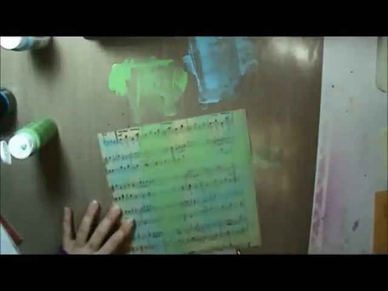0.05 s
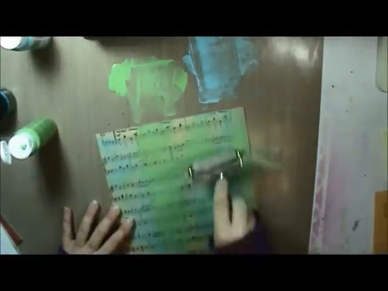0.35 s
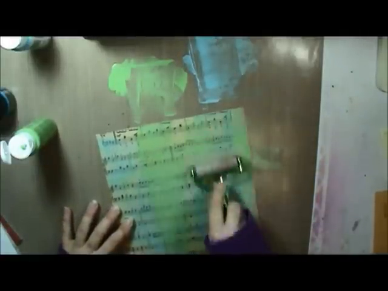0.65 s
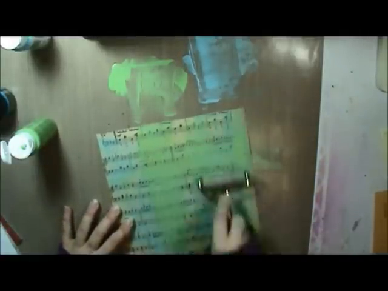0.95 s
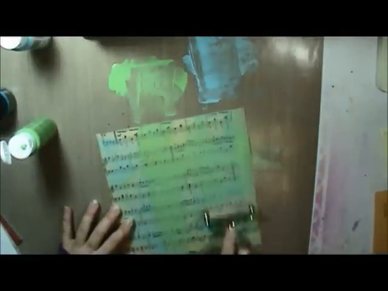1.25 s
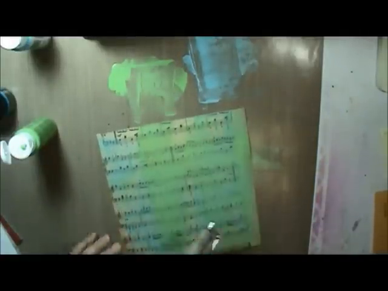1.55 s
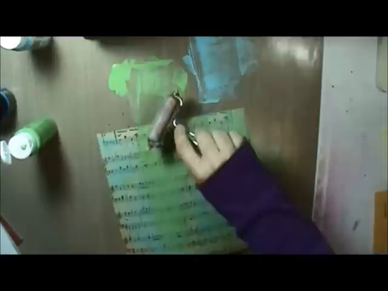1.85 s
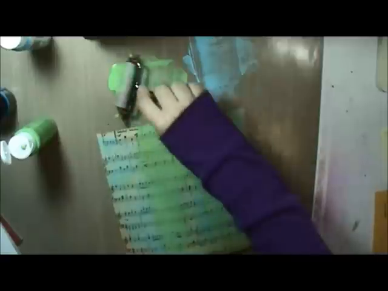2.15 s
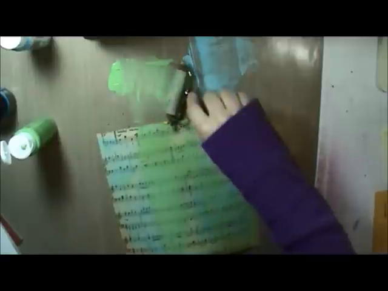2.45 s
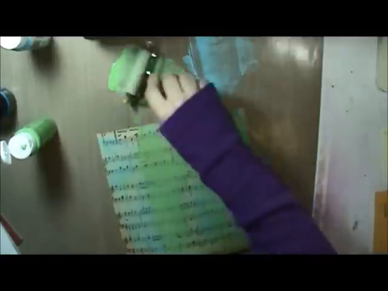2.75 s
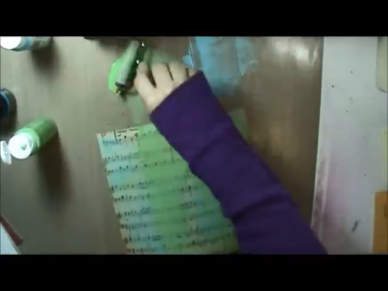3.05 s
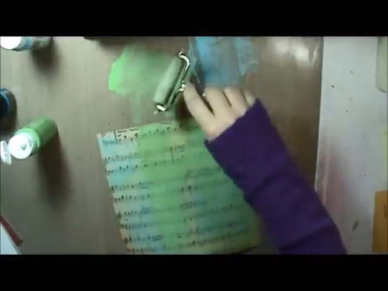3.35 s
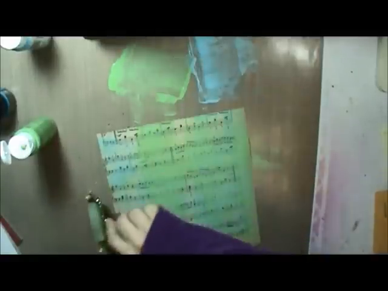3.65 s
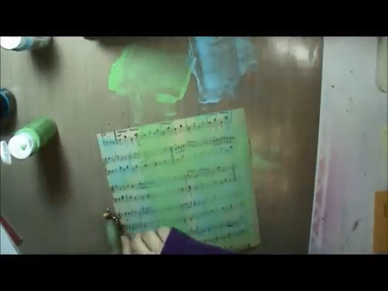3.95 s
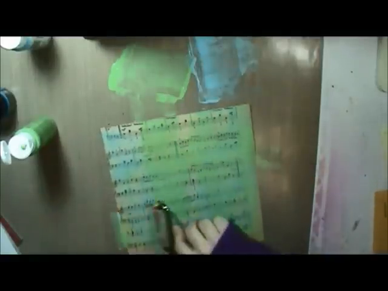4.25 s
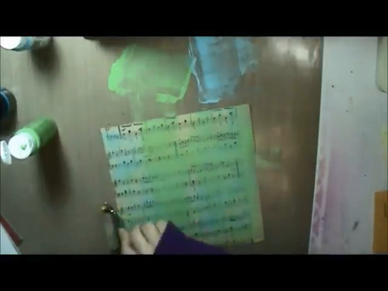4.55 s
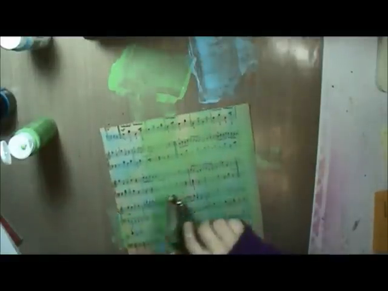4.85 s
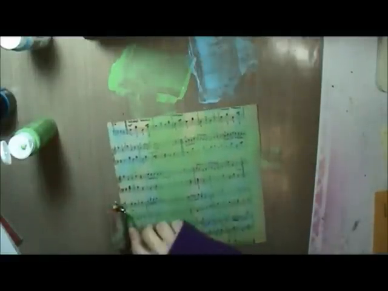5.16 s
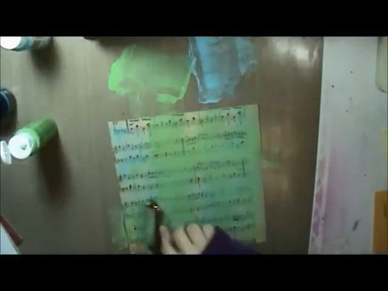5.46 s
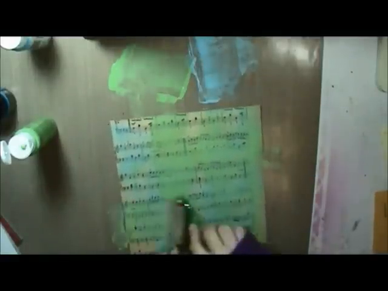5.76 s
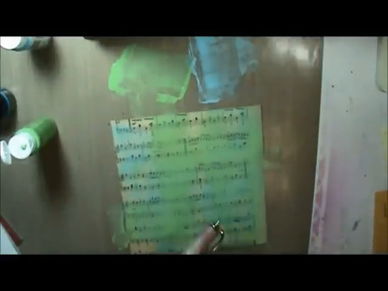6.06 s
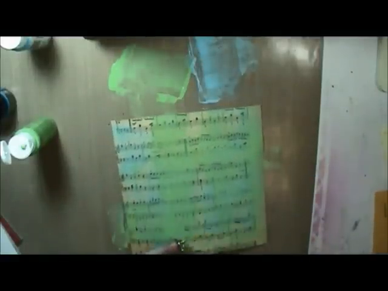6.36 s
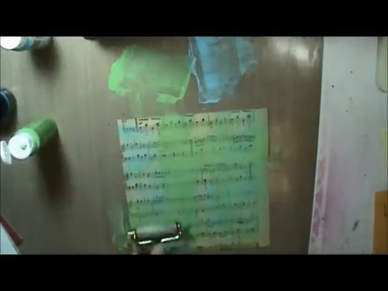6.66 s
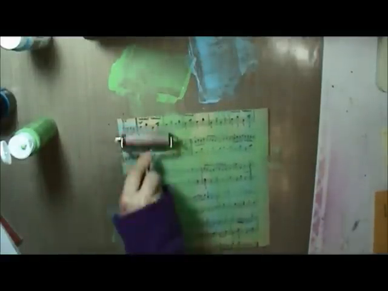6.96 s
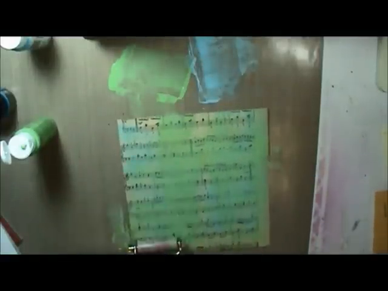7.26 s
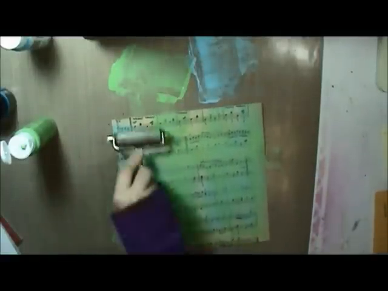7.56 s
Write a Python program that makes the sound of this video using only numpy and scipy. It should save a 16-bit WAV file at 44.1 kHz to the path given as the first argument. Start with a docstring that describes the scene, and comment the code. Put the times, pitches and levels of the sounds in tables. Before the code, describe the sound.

A rubber roller spreads wet paint over paper on a table, heard fairly close in a small room. Each stroke swells and fades with a low, hollow rumble and a fine, sticky rasp. At 0.5 seconds the roller knocks down with a scuff and a metallic tick, then makes three quick strokes until 1.5. The sharpest knock comes at about 2 seconds, with a click from the metal frame. Softer rolling follows, with tiny, very high axle squeaks, ending in a scuff at 3.3. A clattering knock at 4 seconds starts quick back-and-forth strokes with more chirps and light bumps, running until 5.9, with another knock and scuff at 5.1. After a short lull, a knock at 6.5 leads into three longer strokes with a few ticks, lasting to the end at about 7.7. Faint room noise and electrical hum lie underneath throughout.

```python
"""In a small room, a rubber brayer spreads wet paint over a sheet of paper on a table.
Impacts and rolling bumps excite the table's resonances as knocks and a rumble; threads of tacky paint
snap in a fine rasp. Each stroke swells and fades with the hand's speed, and brief skids scuff.
Stick-slip friction in the dry axle makes short, very high chirps, and the loose roller ticks in its
metal frame. Faint room noise and mains hum lie beneath."""
import sys
import numpy as np
from scipy import signal
from scipy.fft import rfft, irfft
from scipy.io import wavfile

SR = 44100
rng = np.random.default_rng(int(sys.argv[2]) if len(sys.argv) > 2 else 0)


def log_audio(samples):
    """Write samples as a 16-bit WAV file to the path given in sys.argv[1]."""
    # one column per channel
    frames = np.atleast_2d(samples).T
    # limit to full scale, then quantise
    limited = np.clip(frames, -1, 1)
    pcm = np.round(limited * 32767).astype(np.int16)
    wavfile.write(sys.argv[1], SR, pcm)


N = 336086
TIME = np.arange(N) / SR


def amp(db):
    """Amplitude ratio of a level in decibels."""
    return 10 ** (np.asarray(db) / 20)


def unit(x):
    """Normalisation to an rms of 1."""
    return x / np.sqrt(np.mean(x ** 2) + 1e-20)


def read(points, hz):
    """Interpolation of a curve on a logarithmic frequency axis."""
    f, value = np.transpose(points)
    return np.interp(np.log(hz + 1), np.log(f + 1), value)


def colour(x, points):
    """Spectral shaping by a curve of gains in dB."""
    size = x.shape[-1]
    return irfft(rfft(x) * amp(read(points, np.fft.rfftfreq(size, 1 / SR))), size)


def wander(size, hz):
    """Random modulation: low-passed Gaussian noise with an rms near 1."""
    padded = size + 4096
    lowpass = np.exp(-.5 * (np.fft.rfftfreq(padded, 1 / SR) / hz) ** 2)
    return unit(irfft(rfft(rng.standard_normal(padded)) * lowpass))[:size]


def band(size, hz, octaves):
    """Band-pass noise with steep flanks at the given octaves either side of hz."""
    detuning = np.log2((np.fft.rfftfreq(size, 1 / SR) + 1) / hz) / octaves
    return irfft(rfft(rng.standard_normal(size)) / (1 + detuning ** 4) ** 0.56, size)


def add(mix, start_s, sound):
    """Superposition of a sound on the mix."""
    part = mix[max(round(start_s * SR), 0):][:len(sound)]
    part += sound[:len(part)]


def grains(per_s, spread_db):
    """Shot noise: randomly timed impulses, a few much larger than the rest."""
    height = amp(spread_db * np.minimum(rng.exponential(1, N), 4.5))
    return unit(height * rng.choice([-1, 1], N) * (rng.random(N) < per_s / SR))


def resonate(drive, modes):
    """Forced vibration: each mode's response adds to the driving signal."""
    return drive + sum(amp(db) * signal.lfilter(*signal.iirpeak(hz, hz / width, SR), drive)
                       for hz, width, db in modes)


def background():
    """Broadband room noise and the wavering partials of mains hum swell and ebb together."""
    # Each row: frequency in Hz, relative spectral density in dB.
    air_spectrum = [(15, -46.5), (25, -11.5), (92, -11), (123, -5), (153, -11.5), (317, -12.5),
                    (463, -18.5), (591, -15), (641, -19), (863, -18), (1400, -19), (1740, -23.5),
                    (1940, -19), (3620, -25), (16000, -30)]
    # Each row: frequency in Hz, relative level in dB.
    partials = [(118.4, -58.5), (597.5, -67), (839.8, -72.5), (1260, -75.5), (1938, -77.5), (2562, -76.5)]
    # Each row: time in seconds, gain in dB.
    swell = [(0, 6), (.45, 2), (1.6, 5), (2.5, 3), (3.6, 6), (5, 8), (6.3, 5), (7.6, 9.5)]
    mid, side = colour(rng.standard_normal((2, N)), air_spectrum)
    air = unit(mid) + amp(-11) * unit(side) * np.array([[1], [-1]])
    hum = np.zeros(N)
    for hz, db in partials:
        peak = np.sqrt(2) * amp(db + wander(N, hz=0.88))
        hum += peak * np.sin(2 * np.pi * hz * TIME + 0.41 * wander(N, hz=1.6))
    return (amp(-54) * air + hum) * amp(np.interp(TIME, *np.transpose(swell)))


def room(x, wet_db, reflections_per_s=4000):
    """Reverberation: sparse reflections follow the direct sound and decay exponentially in each band."""
    # Each row: frequency in Hz, time to decay by 60 dB in seconds.
    decay_times = [(150, 0.35), (400, 0.23), (1000, 0.28), (2800, 0.33), (7000, .26), (11000, 0.22),
                   (16000, 0.09)]
    # Each row: frequency in Hz, side level against mid in dB.
    side_spectrum = [(60, -12), (130, -23), (280, -9), (600, -4.5), (1400, 1), (2800, 2), (6000, -5),
                     (11000, -6)]
    size = SR // 2
    taps = rng.standard_normal((2, size)) * (rng.random((2, size)) < reflections_per_s / SR)
    taps[:, :int(.003 * SR)] = 0
    mid, side = taps[0], colour(taps[1], side_spectrum)
    hz, t, bands = signal.stft(np.array([mid + side, mid - side]), SR, nperseg=256)
    decay = amp(-60 * t / read(decay_times, hz)[:, None])
    tail = signal.istft(bands * decay, SR, nperseg=256)[1]
    tail /= np.linalg.norm(tail, axis=1, keepdims=True)
    return x + amp(wet_db) * signal.fftconvolve(x[None], tail, axes=1)[:, :N]


def table_direction(x):
    """Phase and level differences: the table's low midrange is earlier and stronger on the right."""
    # Each row: frequency in Hz, phase lead of the left channel in radians.
    lead = [(60, 0.17), (150, -0.26), (340, -0.2), (550, -0.24), (1200, -0.31), (2600, 0.133), (16000, 0)]
    # Each row: frequency in Hz, left minus right level in dB.
    balance = [(60, 3), (130, 0.2), (300, -2.1), (700, -1.2), (1300, -1.1), (2400, -0.5), (16000, 1.5)]
    hz = np.fft.rfftfreq(N, 1 / SR)
    half = np.array([[.5], [-.5]])
    return irfft(rfft(x) * np.exp(1j * half * read(lead, hz)) * amp(half * read(balance, hz)), N)


def table_top(drive):
    """Modal resonance: the table top rings at its natural frequencies."""
    # Each row: frequency in Hz, bandwidth in Hz, gain in dB.
    modes = [(130.7, 13, 4), (166.4, 37, 6.5), (227.7, 13, 7), (287, 6.4, -8), (309.4, 13.7, 3),
             (423, 63.6, -3.5), (508, 18, -5), (725, 12, 3.5), (862, 35, -4.5), (1242, 24, -11)]
    return resonate(drive, modes)


def scuffs(judder_db=3):
    """Sliding friction: the roller and the sheet skid in short, juddering bands of noise; the rows at 0.54 s
    and 6.464 s are brief rattles of the metal frame."""
    # Each row: start and length in seconds, level in dB, centre in Hz, half-width in octaves.
    skids = [(.54, 0.033, -33.5, 2370, 1.4), (1.382, 0.11, -51, 2600, 0.87), (1.449, 0.25, -53.5, 4000, 2),
             (2.056, 0.052, -25.5, 1030, 0.53), (2.562, 0.052, -49, 720, 0.44),
             (2.845, 0.019, -44, 1180, 0.22), (3.329, .02, -37, 900, 2.3), (3.33, 0.045, -40, 7000, 2),
             (4.03, 0.024, -27.5, 726, 0.24), (4.102, 0.082, -40.5, 2400, 0.9),
             (4.672, 0.014, -40, 2350, 0.26), (4.836, 0.019, -46.5, 2880, .16),
             (4.985, 0.061, -48, 1940, 0.44), (5.136, 0.04, -26.5, 570, 0.45), (6.2, 0.23, -60, 2080, .07),
             (6.464, 0.092, -39, 1810, 1.2)]
    out = np.zeros(N)
    for start, length, db, hz, octaves in skids:
        size = 2 * max(int(length * SR / 2), 64)
        grip = signal.windows.tukey(size, .7) * amp(judder_db * wander(size, hz=122.3))
        add(out, start, amp(db) * unit(band(size, hz, octaves) * grip))
    return out


def ticks(snap_cycles=4.9, ring_s=0.01, ring_db=-20, level_db=-4.5):
    """Hard contact: the loose roller strikes its frame with a snap of a few cycles and a faint ring."""
    # Each row: start in seconds, relative level in dB, centre in Hz, half-width in octaves.
    contacts = [(.094, -17, 5200, 1), (.206, -14.5, 8800, 0.75), (0.539, -13, 3900, 1.2),
                (.546, -0.5, 10900, .28), (1.27, -14, 10200, 0.47), (1.455, -14, 9400, 0.52),
                (1.762, -31, 4830, 1.4), (1.793, -32, 6000, 1.5), (2.004, -27.5, 7500, 0.63),
                (2.052, 1, 10000, 1.9), (2.0603, -4.5, 10500, 2.4), (2.066, -0.5, 10900, 0.24),
                (2.574, -13, 9100, 1.5), (3.329, -9, 10200, 0.68), (3.497, -31, 5000, 1),
                (4.034, -9.5, 8600, 0.5), (4.135, -21.5, 2000, 0.25), (4.162, -20, 10000, 0.26),
                (4.629, -16, 10600, 0.18), (4.645, -25, 3360, 0.83), (4.860, -22, 7000, 0.79),
                (4.890, -21.5, 7840, 0.38), (5.1553, -4, 9700, .5), (5.202, -12.5, 10100, 0.25),
                (5.920, -18, 8300, 0.44), (6.068, -28, 1650, 0.28), (6.4548, -14.5, 1570, 0.27),
                (6.454, -24.5, 3500, 0.43), (6.492, -22.5, 2700, 1.8), (6.502, -11.5, 7950, 0.27),
                (7.080, -20, 10300, 0.28), (7.124, -14, 10300, 0.11)]
    out, t = np.zeros(N), np.arange(SR // 15) / SR
    for start, db, hz, octaves in contacts:
        fade = np.exp(-t * hz / snap_cycles) + amp(ring_db) * np.exp(-t / ring_s)
        tick = band(len(t), hz, octaves) * fade
        add(out, start, amp(db + level_db) * tick * np.linalg.norm(fade) / np.linalg.norm(tick))
    return out


def knocks(thump_s=0.0031, clatter_s=0.0095, attack_s=0.00027, clatter_db=-8, level_db=-3):
    """Impact excitation: a damped thump of the rubber and a clatter of the frame ring the table."""
    # Each row: start in seconds, relative level in dB, thump pitch in Hz, relative clatter in dB.
    impacts = [(.5395, -4.5, 298, -2.5), (.688, -17, 298, -6), (0.876, -30, 304, 7.5),
               (1.211, -18.5, 250, -23), (2.0487, -6, 313, -8), (2.059, -13, 318, 11.5),
               (2.574, -23, 310, 0), (3.329, -31, 302, 3), (4.0298, -13, 330, 9.5), (4.034, -27, 238, 15.5),
               (4.141, -14, 156, -24), (4.537, -13, 203, -13), (4.643, -21, 414, 5.5),
               (5.140, -12, 228, -3.5), (5.150, -13, 198, -5), (5.693, -21.5, 251, -1.5),
               (6.495, -11.5, 184, -3.5), (6.512, -13.5, 194, -9), (7.123, -16, 734, -3.5)]
    # Each row: frequency in Hz, relative spectral density in dB.
    clatter_spectrum = [(40, -42), (100, -12), (200, 4), (330, -10.5), (600, 1.5), (1000, -8.5),
                        (1700, -11), (2700, -18.5), (5000, -27), (10000, -21), (16000, -30)]
    out, t = np.zeros(N), np.arange(SR // 5) / SR
    attack = 1 - np.exp(-t / attack_s)
    for start, db, hz, frame_db in impacts:
        thump = np.sin(2 * np.pi * hz * t) * np.exp(-t / thump_s)
        clatter = unit(colour(rng.standard_normal(len(t)), clatter_spectrum)) * np.exp(-t / clatter_s)
        add(out, start, amp(db) * (thump + amp(frame_db + clatter_db) * clatter) * attack)
    # The table radiates little below its first resonance.
    radiation = signal.butter(2, 118, "high", fs=SR, output="sos")
    return amp(level_db) * signal.sosfilt(radiation, table_top(out))


def squeaks(sag_hz_per_s=670, waver_hz=228, edge_s=0.0081, rattle_db=-12, level_db=-4):
    """Stick-slip friction: the dry axle squeals near its resonances, and rough slips chatter."""
    # Each row: start and length in seconds, relative level in dB, pitch in Hz, roughness (0 is pure).
    chirps = [(0.634, .0073, -10.5, 10730, 0.12), (0.688, 0.0093, -20, 10500, 0.54),
              (1.211, 0.0019, -14.5, 10460, 0.77), (1.257, 0.0016, -13.5, 10330, 0.8),
              (1.3613, 0.0021, -16.5, 10300, 0.45), (2.108, 0.027, -17, 9900, .4),
              (2.124, 0.044, -16, 10470, 0.4), (2.194, 0.041, -22, 11310, 0.07),
              (2.241, 0.039, -20, 10980, 0.25), (2.323, .014, -28, 10180, 0.36),
              (2.35, .029, -18, 10260, 0.7), (2.619, 0.034, -17.5, 10540, 0.34),
              (2.688, 0.025, -25, 11300, 0.1), (2.769, .016, -20, 10770, 1.03),
              (2.784, .027, -11, 10460, 0.47), (2.998, .016, -22, 11200, 0.35),
              (3.009, .023, -9.5, 10460, 0.36), (3.027, 0.028, -13, 11270, 0.22),
              (3.159, 0.022, -14, 10460, 0.24), (3.219, .009, -26.5, 10450, 0.22),
              (4.216, .005, -24.5, 10580, .5), (4.243, .02, -28.5, 10200, 0.66),
              (4.273, .035, -17.5, 10590, .8), (4.419, 0.036, -14.5, 11270, .3),
              (4.495, 0.042, -11, 11210, 0.34), (4.502, 0.027, -21, 10510, 0.23),
              (4.693, .023, -15, 10720, 0.31), (5.259, .012, -31.5, 10660, .8),
              (5.456, 0.04, -17, 11100, .5), (5.459, .022, -10, 10450, 0.42),
              (5.548, 0.0061, -13.5, 11450, 0.27), (5.57, 0.013, -24, 11320, 0.2),
              (5.694, 0.019, -20, 10640, 0.14), (5.716, 0.012, -7, 10500, 0.15),
              (5.823, 0.014, -17.5, 10600, 0.6), (5.885, 0.028, -29, 10080, .55),
              (7.535, 0.0065, -21.5, 11300, 0.2)]
    # Each row: frequency in Hz, bandwidth in Hz, gain in dB.
    axle_modes = [(10610, 420, -4.5), (11350, 950, -1)]
    out = np.zeros(N)
    for start, length, db, hz, rough in chirps:
        edge = min(edge_s, 2 * length)
        size = 2 * max(int((length + edge) * SR / 2), 64)
        sag = sag_hz_per_s * length * np.linspace(-.5, .5, size)
        pitch = hz - sag + rough * waver_hz * wander(size, hz=69.6)
        jitter = rough * wander(size, hz=406)  # slips come early or late
        phase = 2 * np.pi * np.cumsum(pitch) / SR + jitter
        envelope = signal.windows.tukey(size, min(2 * edge / (length + edge), 1))
        chatter = 1 + np.tanh(0.97 * rough * wander(size, hz=337))
        rattle = rough * amp(rattle_db) * unit(band(size, hz, octaves=0.15))
        squeal = unit(chatter * np.sin(phase) + rattle)
        add(out, start - edge / 2, amp(db + level_db) * envelope * squeal)
    return resonate(out, axle_modes)


def hand_speed(start, length, fastest):
    """Acceleration from rest and back to rest: one smooth arch of height 1."""
    turn = np.interp(TIME, start + length * np.array([0, fastest, 1]), [0, 1, 0])
    return np.sin(np.pi / 2 * turn)


def rolling(rumble_db=-1, rasp_db=2, uneven_db=1.73, rumble_exponent=1.93):
    """Roughness and adhesion: bumps shake the table and paint threads snap, both louder with speed."""
    # Each row: start and length in seconds, fraction of the length at which speed peaks,
    # relative rumble and rasp levels in dB, nearness to the table's front edge from 0 to 1.
    strokes = [(-.14, 0.25, 0.27, -27, -48, 0.67), (0.54, 0.35, 0.64, -31, -51.5, 0.07),
               (0.9, 0.21, 0.57, -29, -49.5, 0.3), (1.148, .31, 0.25, -28, -48, 0.21),
               (2.283, 0.29, 0.37, -37, -55.5, 0.17), (2.545, 0.19, 0.31, -38.5, -56, 0),
               (2.705, 0.25, 0.39, -39, -54.5, 0.28), (2.975, 0.12, .3, -38, -53, 0),
               (3.131, .21, 0.33, -39.5, -52.5, 0.06), (4.03, 0.24, 0.63, -39.5, -47.5, 0.53),
               (4.2, 0.19, 0.46, -34.5, -49, 0.27), (4.379, 0.23, 0.6, -32, -49, 0.54),
               (4.59, 0.28, 0.37, -31, -46, 0.42), (5.15, .31, 0.42, -33, -49, 0.42),
               (5.402, 0.29, 0.37, -33, -51, 0.55), (5.65, 0.26, 0.41, -32.5, -51.5, 0.59),
               (6.638, 0.34, 0.54, -35, -49, 0.34), (6.986, 0.27, 0.39, -30.5, -47, 0.25),
               (7.317, 0.39, 0.58, -32.5, -50, 0.27)]
    # Rumble at the table's far side and near edge, and the paint's rasp.
    # Each row: frequency in Hz, gain in dB.
    far_spectrum = [(40, -37.5), (90, -13), (140, -6.5), (200, 0.5), (280, 1.5), (400, 1.5), (560, 0.5),
                    (800, -4.5), (1100, -8), (1500, -17.5), (2200, -18.5), (5000, -26.5), (9000, -72.5)]
    near_spectrum = [(40, -47.5), (85, -32), (125, 7.5), (200, 7), (280, -22.5), (400, -9.5), (560, 0),
                     (800, -3.5), (1100, -19), (1500, -5.5), (2200, -28.5), (5000, -50), (9000, -69)]
    rasp_spectrum = [(500, -11), (1500, 9.5), (2500, 5.5), (4000, 2), (7000, 0.5), (9000, 3), (11000, 4.5),
                     (13000, 0.5), (16000, -17.5)]
    far, near, rasp = np.zeros((3, N))
    for start, length, fastest, low_db, high_db, nearness in strokes:
        speed = hand_speed(start, length, fastest)
        rumble = amp(low_db) * speed ** rumble_exponent
        far += (1 - nearness) * rumble
        near += nearness * rumble
        rasp += amp(high_db) * speed
    shake = table_top(grains(per_s=1700, spread_db=3.0))
    bumps = far * unit(colour(shake, far_spectrum)) + near * unit(colour(shake, near_spectrum))
    threads = unit(colour(grains(per_s=5000, spread_db=2.5), rasp_spectrum))
    pressure = amp(uneven_db * wander(N, hz=25))
    return pressure * (amp(rumble_db) * bumps + amp(rasp_db) * rasp * threads)


def scene():
    """Superposition: table and metal sounds reverberate in the small room, over its background."""
    table = room(rolling(), wet_db=-4) + room(knocks(), wet_db=-4) + room(scuffs(), wet_db=-6)
    metal = room(ticks(), wet_db=-4.5) + room(squeaks(), wet_db=-6.5)
    return table_direction(table) + metal * amp([[-.2], [.2]]) + background()


def record(dry):
    """Clipping at full scale, then band limiting to 16 kHz."""
    lowpass = signal.firwin(401, 16000, window=("kaiser", 8), fs=SR)
    return signal.oaconvolve(np.clip(dry, -1, 1), lowpass[None], "same")


dry = scene()
out = record(dry)
log_audio(out)
```